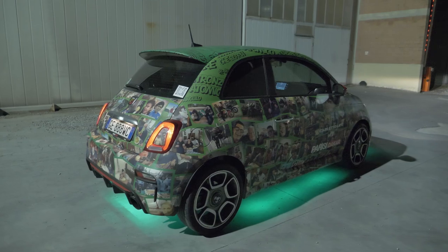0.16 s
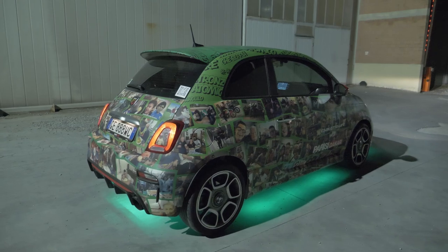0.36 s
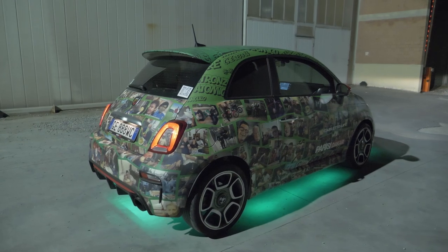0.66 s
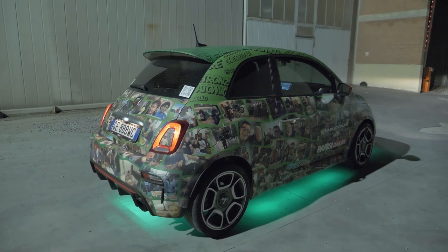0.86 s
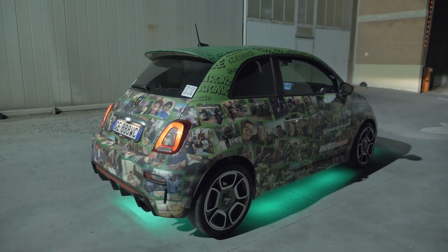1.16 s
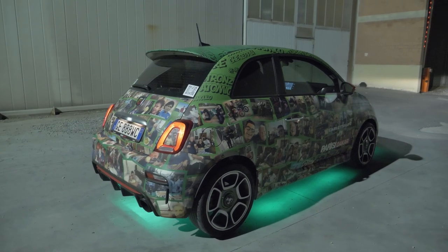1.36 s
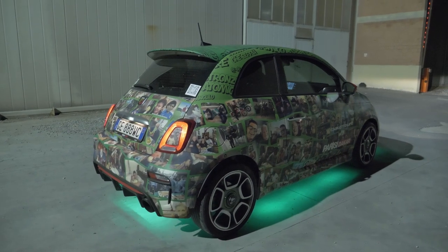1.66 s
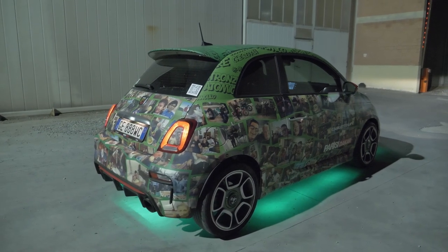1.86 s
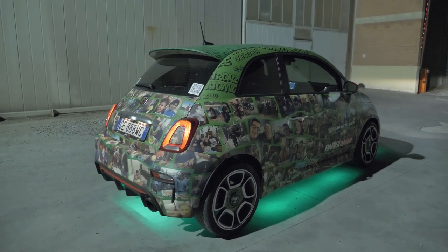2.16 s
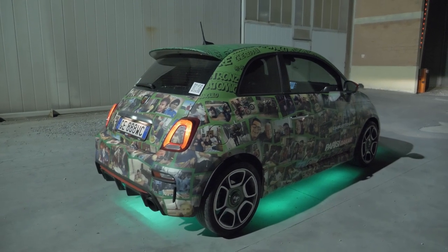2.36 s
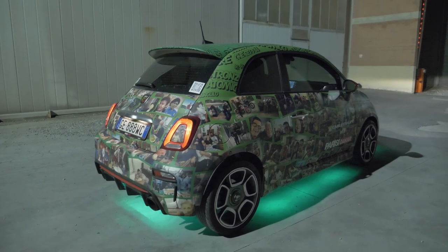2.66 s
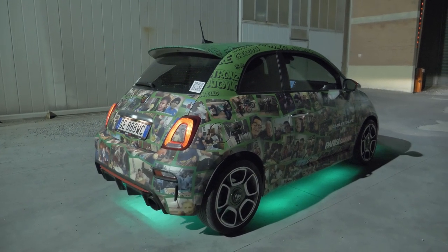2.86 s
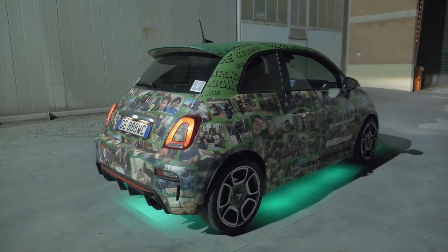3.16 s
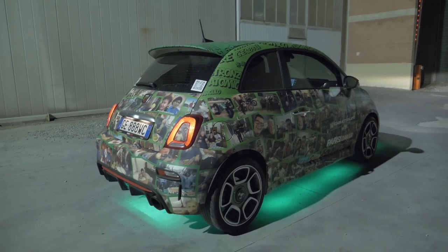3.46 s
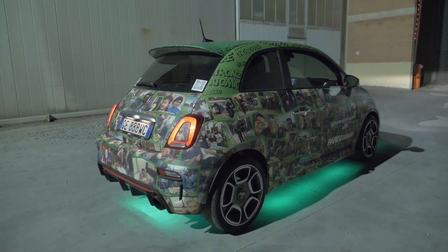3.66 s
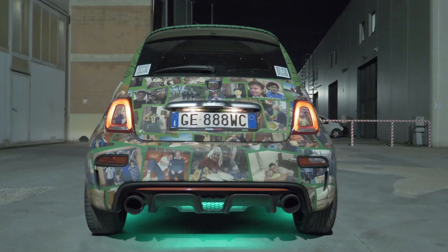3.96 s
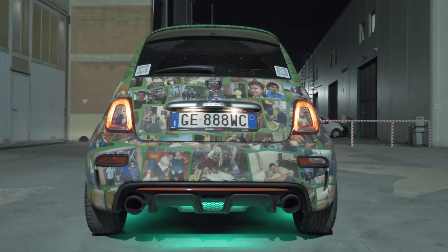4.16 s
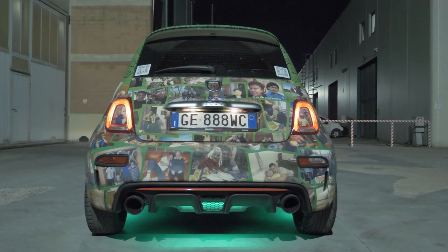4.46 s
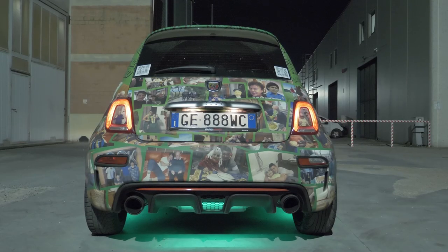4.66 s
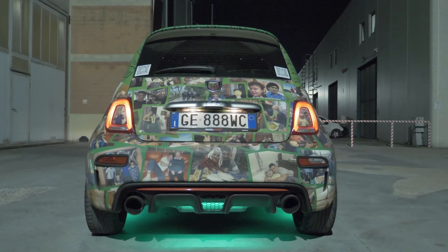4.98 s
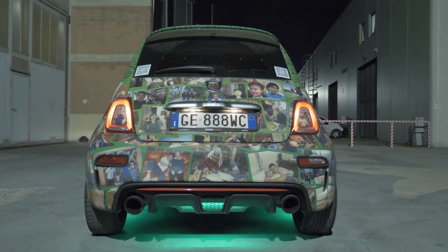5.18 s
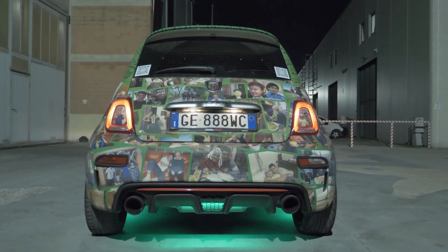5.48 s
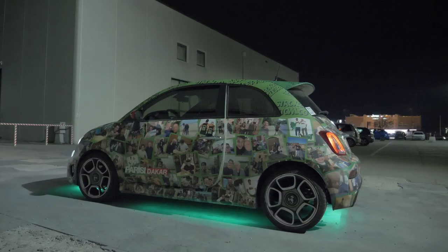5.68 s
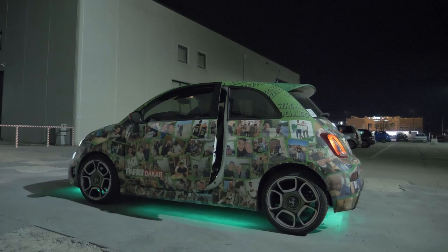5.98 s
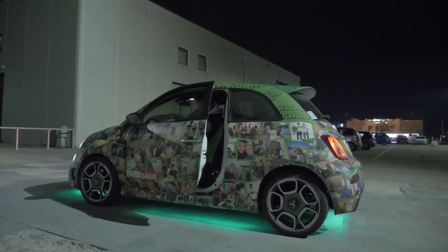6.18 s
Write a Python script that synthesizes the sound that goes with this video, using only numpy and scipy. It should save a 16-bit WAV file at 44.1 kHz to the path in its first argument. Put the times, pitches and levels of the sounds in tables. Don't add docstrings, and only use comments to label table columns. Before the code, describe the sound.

Steady four-cylinder idle in a paved yard at night, heard from three spots: raspy, then boomy with whine, then faint as a door clicks open.

```python
import sys
import numpy as np
from scipy import signal
from scipy.fft import rfft, irfft
from scipy.io import wavfile
from scipy.ndimage import uniform_filter1d, map_coordinates

SR = 44100
rng = np.random.default_rng(int(sys.argv[2]) if len(sys.argv) > 2 else 0)


def invert_db(level):
    return 10 ** (np.asarray(level, dtype=float) / 20)


def output_pcm(signal):
    pcm = np.clip(np.atleast_2d(signal).T, -1, 1) * 32767
    wavfile.write(sys.argv[1], SR, np.round(pcm).astype(np.int16))


N = 279020

# start t/s, end t/s, part of the four-stroke cycle done at the start [cycles]
SPOTS = [
    (.0456, 3.8165, .2673),
    (3.8165, 5.656, .0250),
    (5.656, 6.33, .0153),
]
FADE_S = [0.000085, 0.0013, .008]

IDLE_RPM = [853.65, 850.65, 842.75]
# t/s, speed lost [rpm], spread t/s
STUMBLES = [
    [(.104, -7.6, .061), (1.271, 7.2, .088), (1.939, 5.4, .172), (2.836, 7.8, .085), (3.415, 2.6, .191)],
    [(3.6, 5, .75), (5.273, 5.4, .106)],
    [],
]
# level/dB at the start, level/dB at the end
LOAD_DB = [(-.5, 0.8), (-1, -0.5), (0, -5)]

# f/Hz, level/dB per Hz; then its rms level/dB at each spot
RUMBLE = [(30, 0), (60, 18), (120, 22.5), (200, 25.5), (270, 2), (450, -27.5)]
RUMBLE_DB = [-33, -32, -41.5]
# f/Hz, level/dB per Hz; then its rms level/dB at each spot
BAY_NOISE = [
    [(300, -2.5), (420, -5.5), (500, -8.5), (620, -8.5), (1190, -5.5), (1400, -12.5), (3000, -24.5),
     (5000, -31.5), (6500, -33.5), (8300, -30), (9000, -33), (10000, -43), (12500, -40), (15600, -58)],
    [(285, -9.5), (340, 5), (430, -12), (520, -4), (700, -3), (800, -12.5), (1690, -14), (2800, -27),
     (4500, -29.5), (6500, -29.5), (8300, -27.5), (9000, -33), (10000, -42.5), (12500, -40), (15600, -54)],
    [(300, -2), (420, -5.5), (700, -9.5), (1610, -21.5), (3200, -31), (6500, -35), (8300, -32), (9000, -36),
     (10000, -47), (12500, -44), (15600, -62)],
]
BAY_NOISE_DB = [-34.5, -36, -40]
BAY_THROB_DB = [1, 2, 0.5]
# level/dB above the first split, level/dB above the second
TOP_THROB_DB = [(0.79, 2.4), (0.88, 3.5), (.5, 1.5)]
SPLIT_HZ = 4000, 9800

# rms level/dB at the start, rms level/dB at the end
WHINE_DB = [(-48, -45.5), (-38.5, -41.5), (-53, -52)]
# t/s, loss level/dB, spread t/s
WHINE_NULLS = [(.55, 4.5, .15), (1.3, 9, .12), (1.7, 7, .13), (2.35, 4.5, .2), (3.6, 9.5, .15),
               (4.53, 7, .012), (5.52, 7, .012)]
# f/Hz, width f/Hz, level/dB at each of the three spots
WHISTLES = [
    (5980, 120, -74, -69, -78),
    (11980, 130, -75, -69, -77),
]
WHINE_HZ, WHINE_SAG_HZ_PER_S = 3449, .6

# t/s, peak level/dB, f/Hz, t60 t/s, share of bright snap [0-1]
LATCH = [(5.7813, -43, 7800, .04, .05), (5.781, -38, 1700, .05, .01), (5.799, -39.5, 3500, 0.046, .02),
         (5.9419, -38, 7540, .015, .9), (5.982, -39, 6000, .015, .5), (5.9852, -35, 5250, .015, .02)]
# t/s, length t/s, f/Hz, peak level/dB
DOOR_PUSH = (5.965, .11, 27, -27)

# f/Hz, start [cycles], length t/s, peak level/dB; then its level/dB at each spot
BUZZ = [
    [(385, .747, .040, 0), (375, .12, .05, -9)],
    [(622, .05, .044, 0), (622, .52, .05, 1), (610, .36, .02, -8), (610, .86, .02, -10)],
    [(625, .34, .055, -1), (625, .85, .055, -1)],
]
BUZZ_DB = [-21.5, -28, -35]

# rise t/s, decay t/s, rasp level/dB, hiss level/dB
PUFF = [
    (.0012, 0.0069, -31.5, -43.5),
    (.004, 0.01, -37.5, -48.5),
    (.004, 0.011, -51, -53.5),
]
FIRST_PUFF = [.228, .045, .12]
# f/Hz, level/dB per Hz
PUFF_HISS = [(300, -39), (600, 1), (1500, -3), (3000, -9), (6000, -23.5), (8500, -55), (10000, -46),
             (15600, -44)]
# f/Hz, width f/Hz, level/dB, accent of the strong cylinders level/dB
TAILPIPE = [
    [(608, 68, -12, -1.5), (915.5, 80, -3.5, 6.5), (1033, 79, -5, 11), (1194, 120, 1.5, 1),
     (1578, 125, -11, 7.5), (1756, 130, -9, 6), (2229, 170, -11, 1.5), (2810, 280, -26.5, 0),
     (4290, 300, -26.5, 3), (4710, 260, -25, -0.5)],
    [(382, 130, 5.5, -4.5), (889, 55, -5, 15), (1058, 40, -3, 0), (1386, 94, -16.5, -3),
     (1567, 300, 5.5, 5), (1720, 125, -3.5, 2.5), (1880, 140, -9, 9), (2215, 120, -7.5, 7),
     (3180, 1100, -3.5, 0.5), (3940, 270, -8.5, 1.5)],
    [(393, 110, 2, -5), (880, 380, 2, 9), (1640, 170, 2, 12), (2050, 110, -1, 2), (2340, 98, -10, 6)],
]
# (pipe tones under 1.3 kHz), (those above)
STRONG = [((1.3, -1, .5, -1), (-1, 1, 1, -1)), ((-1, -1, 1, .3), (.5, -1, -1, 1)), ((0, -1, 0, 1),
          (0, -1, 0, 1))]
LOW_LEAD_S = [.0035, .002, .002]
SPREAD_S = .003

# multiple of the firing rate, level/dB at each of the three spots
NOTE = [(1, -21, -19, -12), (2, -13, -17, -13), (3, -12, -15, -13), (4, 0, 0, 0), (5, -7, -1, -2),
        (6, -6, -5, -3), (7, -12, -16, -6), (8, -17, -23, -8), (9, -23, -29, -16), (10, -25, -34, -21),
        (11, -15, -20, -17), (12, -30, -29, -27), (15, -30, -31, -19)]
# multiple, level/dB at each of the three spots
UNEVEN = [(4.5, -31, -28, -26), (5.5, -21, -17, -20), (6.5, -29, -27, -28), (7.5, -31, -35, -22),
          (8.5, -23, -26, -14), (10.5, -28, -45, -29), (11.5, -31, -24, -16), (12.5, -40, -32, -22)]
UNEVEN_TURN = [-1, 2.2, 1.4]
PULSE = [(-.4, -1.4, 1, -.2), (-1.9, -1.7, -1.4, 0), (1.2, -1.4, 5.2, -.4)]
PIPE_NODES = [(2.5, 6.7, 8.7), (2.5, 6.7), (6.7, 8.7)]
NOTE_DB = [-17.5, -17.5, -32]


def rms_one(x):
    return x / np.sqrt(np.mean(x ** 2) + 1e-20)


def coloured(spectrum, size):
    hz, level_db = np.transpose(spectrum)
    f = np.arange(1, size // 2 + 2) * SR / size
    shape = invert_db(np.interp(np.log(f), np.log(hz), level_db))
    shape = shape * np.minimum(f / hz[0], 1) ** 3
    return rms_one(irfft(rfft(rng.standard_normal(size)) * shape, size))


def drift(rate, size):
    knots = rng.standard_normal(int(size / SR * 40) + 3)
    return map_coordinates(knots, [np.arange(size) / SR * min(rate, 39)], order=2)


def resonance(x, hz, width):
    r = np.exp(-np.pi * width / SR)
    gain = (1 - r * r) / 2
    return signal.lfilter([gain, 0, -gain], [1, -2 * r * np.cos(2 * np.pi * hz / SR), r * r], x)


def dips(rows, t):
    return sum((depth * np.exp(-((t - s) / spread) ** 2 / 2) for s, depth, spread in rows), 0 * t)


def ramp(ends, t):
    return np.linspace(*ends, len(t))


def yard_rumble(size, spot):
    return invert_db(RUMBLE_DB[spot]) * coloured(RUMBLE, size)


def bay_noise(firing, spot):
    noise = coloured(BAY_NOISE[spot], len(firing))
    low, most = (signal.sosfiltfilt(signal.butter(2, hz, fs=SR, output="sos"), noise) for hz in SPLIT_HZ)
    beat = np.cos(2 * np.pi * (firing - .2))
    luck = rng.standard_normal(int(firing.max()) + 2)
    uneven = 1 + .3 * luck[np.round(firing + .3).astype(int)]
    high_db, top_db = (depth_db * ((beat + 1) * uneven - 1) for depth_db in TOP_THROB_DB[spot])
    layers = low + invert_db(high_db) * (most - low) + invert_db(top_db) * (noise - most)
    wander = invert_db(1.0 * drift(14, len(firing)))
    return wander * invert_db(BAY_NOISE_DB[spot] + BAY_THROB_DB[spot] * beat) * layers


def pump(t, spot):
    nulls = [row for row in WHINE_NULLS if t[0] < row[0] < t[-1]]
    level_db = ramp(WHINE_DB[spot], t) - dips(nulls, t) + 1.1 * drift(36, len(t))
    hz = WHINE_HZ - WHINE_SAG_HZ_PER_S * t + 1.2 * drift(20, len(t))
    out = np.sqrt(2) * invert_db(level_db) * np.sin(2 * np.pi * np.cumsum(hz) / SR)
    for hz, width, *spot_db in WHISTLES:
        air = resonance(resonance(rng.standard_normal(len(t)), hz, width), hz, width)
        out += invert_db(spot_db[spot]) * rms_one(air)
    return out


def door():
    t, out = np.arange(N) / SR, np.zeros(N)
    tail = np.arange(2000) / SR
    for s, peak_db, hz, t60, bright in LATCH:
        at = round(s * SR)
        spit = rng.standard_normal(2000) * invert_db(-60 * tail / t60)
        body = resonance(resonance(spit, hz, 3000), hz, 3000)
        snap = resonance(spit ** 3, 13000, 5000) / 3
        tick = body + bright * snap
        out[at:at + 2000] += invert_db(peak_db) * tick / np.abs(tick).max()
    s, length, hz, peak_db = DOOR_PUSH
    swell = np.sin(np.pi * np.clip((t - s) / length, 0, 1)) ** 2
    return out + invert_db(peak_db) * swell * np.sin(2 * np.pi * hz * (t - s))


def panel_buzz(cycle, seconds, spot):
    out = 0
    for hz, start, length, peak_db in BUZZ[spot]:
        turn = cycle - start + 1
        since = turn % 1 * seconds
        luck = rng.standard_normal((int(turn.max()) + 1, 3))[turn.astype(int)]
        swell = np.sin(np.pi * np.clip(since / length, 0, 1) ** 0.58) ** 2
        pitch = hz * (1 + .01 * luck[:, 1])
        tone = np.sin(2 * np.pi * pitch * since + .4 * luck[:, 2])
        out = out + invert_db(peak_db + 1.2 * luck[:, 0]) * swell * tone
    return invert_db(BUZZ_DB[spot]) * out


def puffs(firing, seconds, flow, spot):
    rise, decay, rasp_db, hiss_db = PUFF[spot]
    number, since = firing.astype(int), firing % 1 * seconds / 4
    gate = (1 - np.exp(-since / rise)) * np.exp(-since / decay)
    gate = gate * (0.46 + np.maximum(rms_one(flow), 0))
    luck = rng.standard_normal((number.max() + 1, len(TAILPIPE[spot]) + 1))
    shared_db = 1.6 * luck[number, 0]
    rasp, t = 0, np.arange(len(firing)) / SR
    for k, (hz, width, level_db, accent_db) in enumerate(TAILPIPE[spot]):
        own_luck = luck[number, k + 1]
        accent = np.array(STRONG[spot][hz > 1300])[number % 4]
        strength_db = accent_db * accent + shared_db + min(hz / 700, 3) * own_luck
        shed = .3 * np.sin(2 * np.pi * hz * t + 9 * own_luck)
        noise = rng.standard_normal(len(t))
        swell = uniform_filter1d(gate * invert_db(strength_db), round(SPREAD_S * SR))
        burst = swell * (noise + shed) + .13 * noise
        if hz < 1300:
            burst = np.roll(burst, -round(LOW_LEAD_S[spot] * SR))
        ring = resonance(resonance(burst, hz, 1.6 * width), hz, width)
        rasp = rasp + invert_db(level_db) * rms_one(ring)
    hiss = gate * invert_db(shared_db) * coloured(PUFF_HISS, len(t))
    return invert_db(rasp_db) * rms_one(rasp) + invert_db(hiss_db) * rms_one(hiss)


def exhaust_note(cycle, spot):
    step, smear, upper_step, upper_smear = PULSE[spot]
    out = 0
    for k, *spot_db in NOTE + UNEVEN:
        low = min(k, 7)
        phase = step * (low - 4) + smear * (low - 4) * (low - 5) / 2
        phase += upper_step * (k - low) + upper_smear * (k - low) ** 2
        phase += np.pi * sum((k > node) != (4 > node) for node in PIPE_NODES[spot])
        phase += UNEVEN_TURN[spot] * (k % 1 > 0)
        level_sway, phase_sway = drift(9.0, len(cycle)), drift(7.0, len(cycle))
        loose = .06 + .01 * abs(k - 4) ** 1.5
        wave = np.cos(8 * np.pi * k * cycle + phase + loose * phase_sway)
        out = out + invert_db(spot_db[spot] + 2.1 * loose * level_sway) * wave
    return invert_db(NOTE_DB[spot]) * np.sqrt(2) * out


def scene():
    out = door()
    for spot, (start, end, done) in enumerate(SPOTS):
        stop = end + .001
        i = np.arange(round(start * SR), min(round(stop * SR), N))
        t = i / SR
        rpm = IDLE_RPM[spot] - dips(STUMBLES[spot], t)
        cycle = done + np.cumsum(rpm) / 120 / SR
        seconds = 120 / rpm.mean()
        firing = 4 * (cycle - FIRST_PUFF[spot] + 1)
        background = yard_rumble(len(t), spot) + bay_noise(firing, spot) + pump(t, spot)
        buzz = panel_buzz(cycle, seconds, spot)
        note = exhaust_note(cycle, spot)
        rasp = invert_db(ramp(LOAD_DB[spot], t)) * puffs(firing, seconds, note, spot)
        fade = np.clip(np.minimum((t - start) / FADE_S[spot], (stop - t) / .001), 0, 1)
        out[i] += fade * (background + buzz + rasp + note)
    return out[None]


def low_pass(x):
    return signal.sosfilt(signal.butter(12, 15710, fs=SR, output="sos"), x)


def record(dry):
    return low_pass(dry)


dry = scene()
out = record(dry)
output_pcm(out)
```